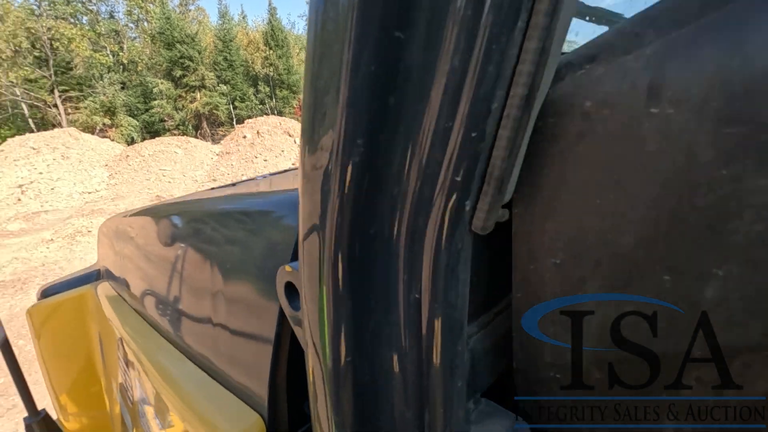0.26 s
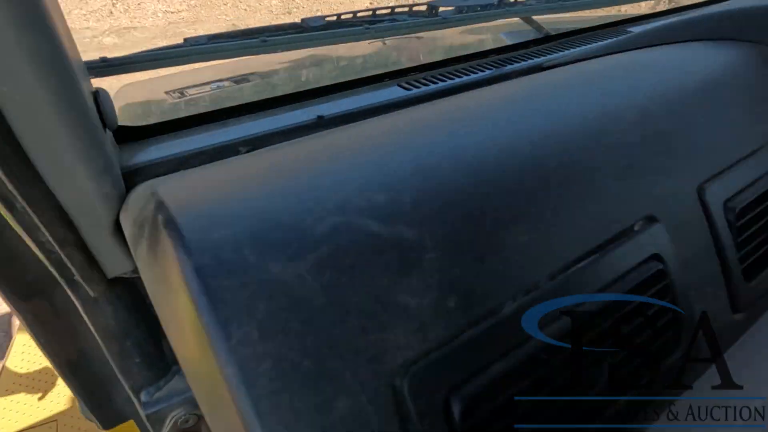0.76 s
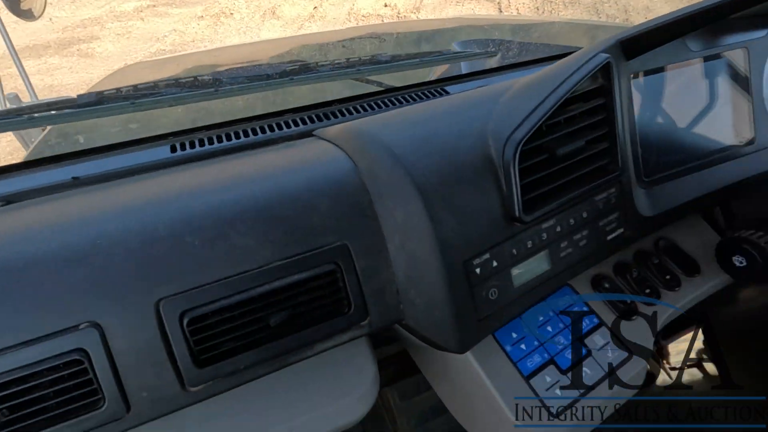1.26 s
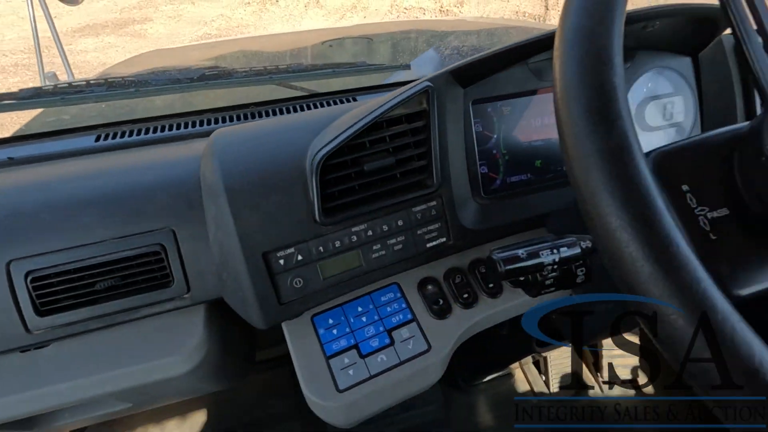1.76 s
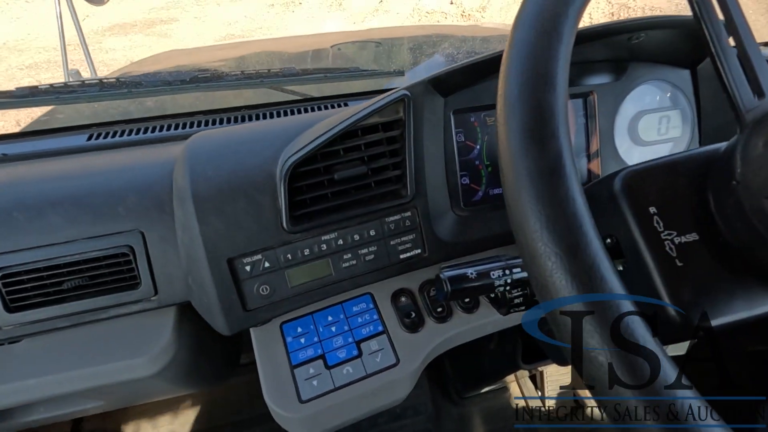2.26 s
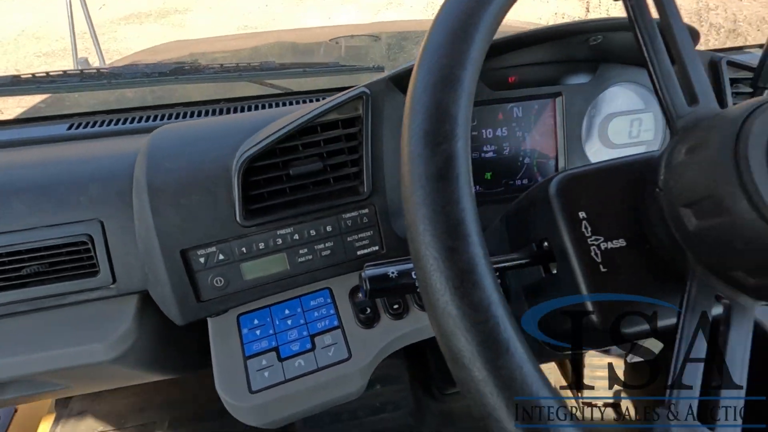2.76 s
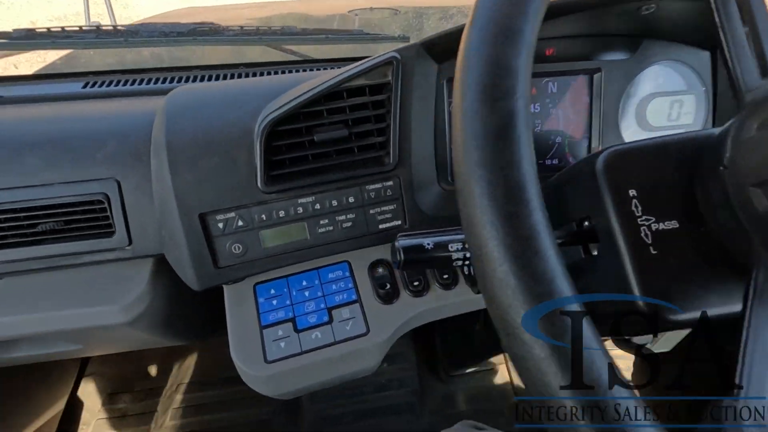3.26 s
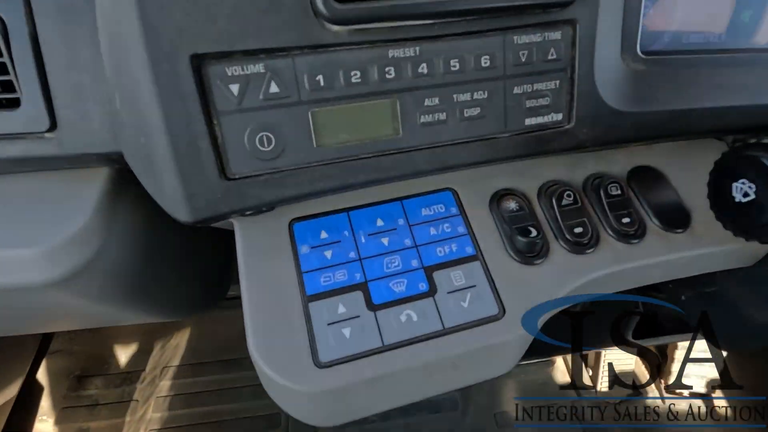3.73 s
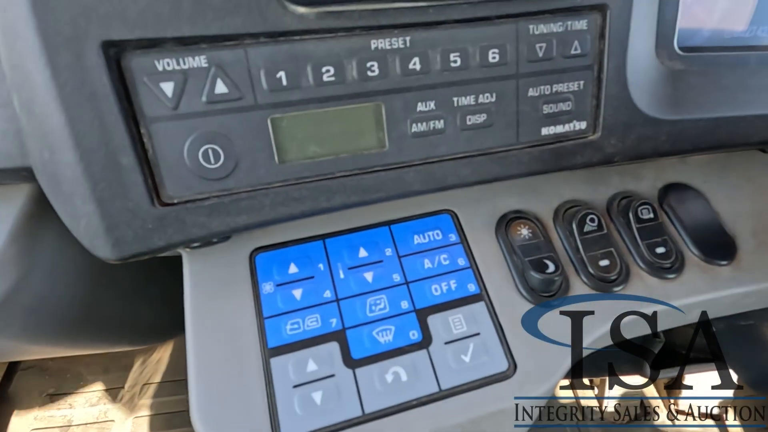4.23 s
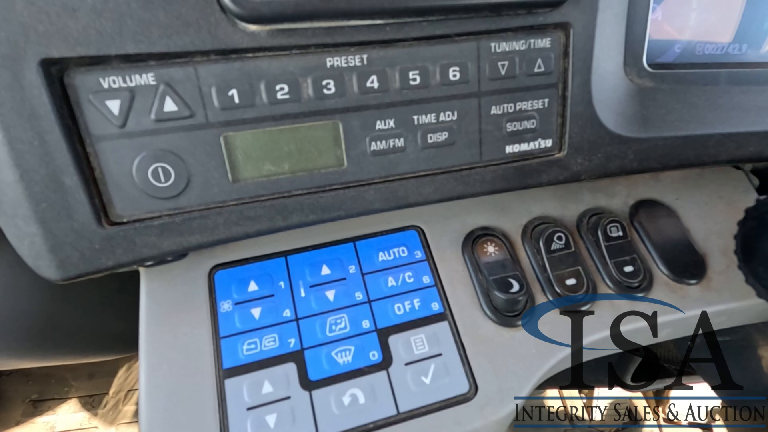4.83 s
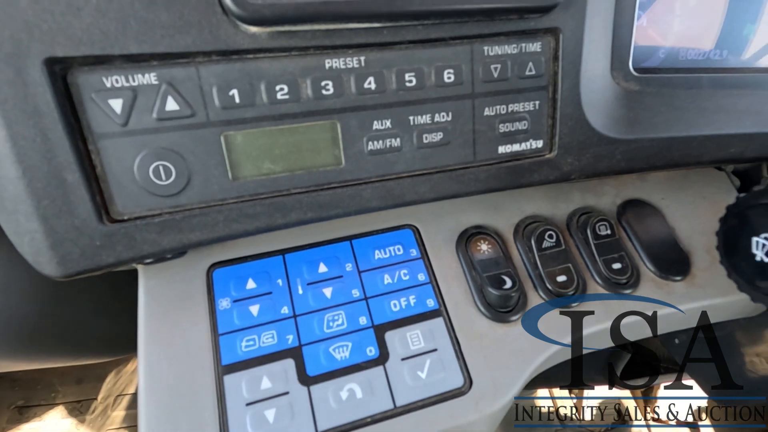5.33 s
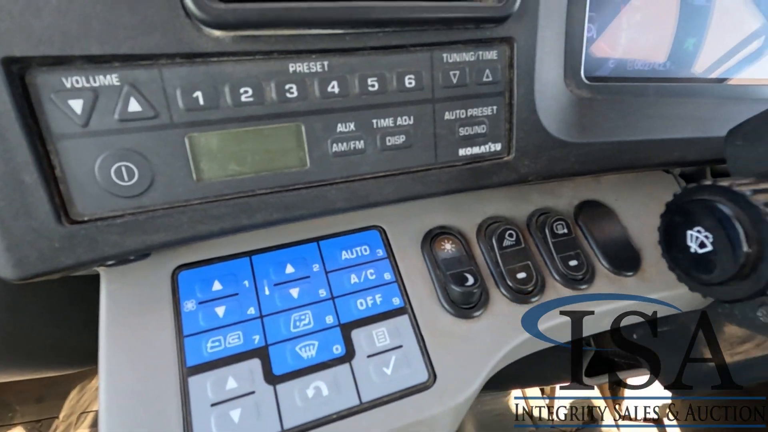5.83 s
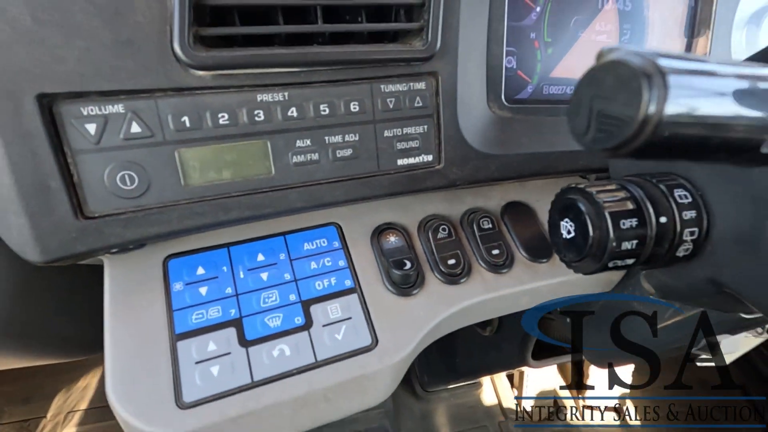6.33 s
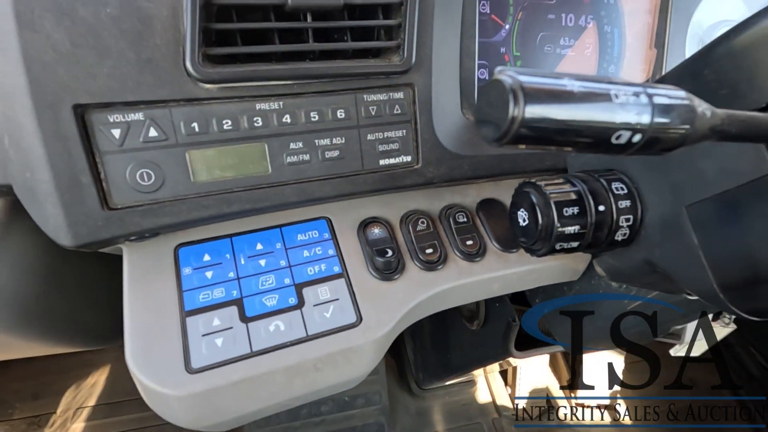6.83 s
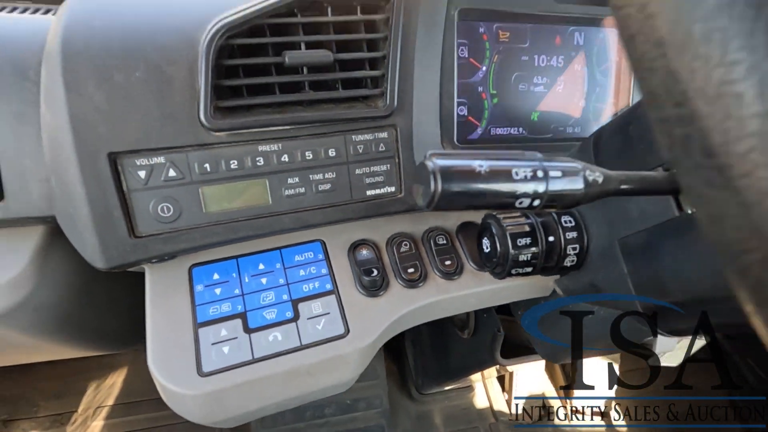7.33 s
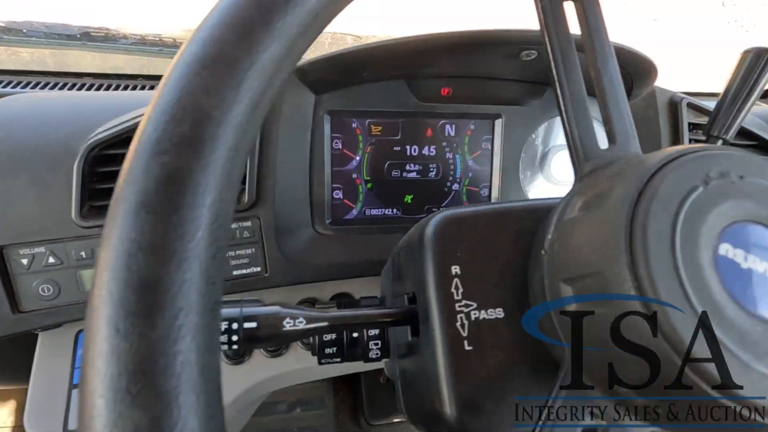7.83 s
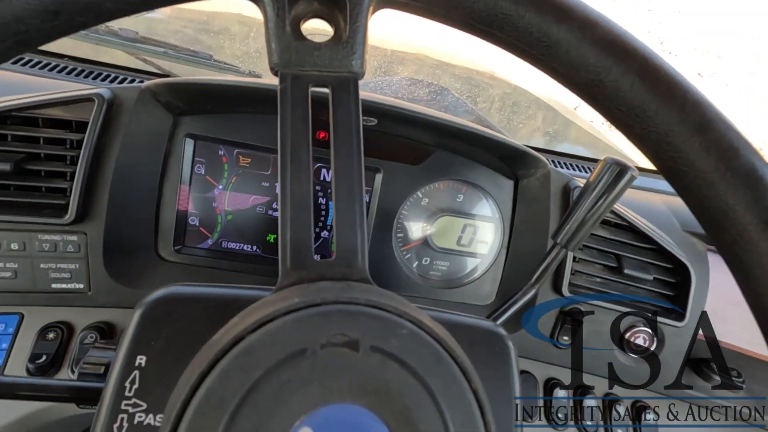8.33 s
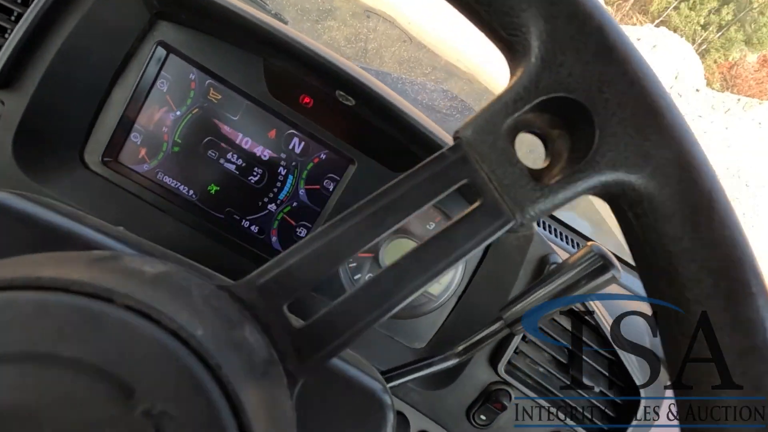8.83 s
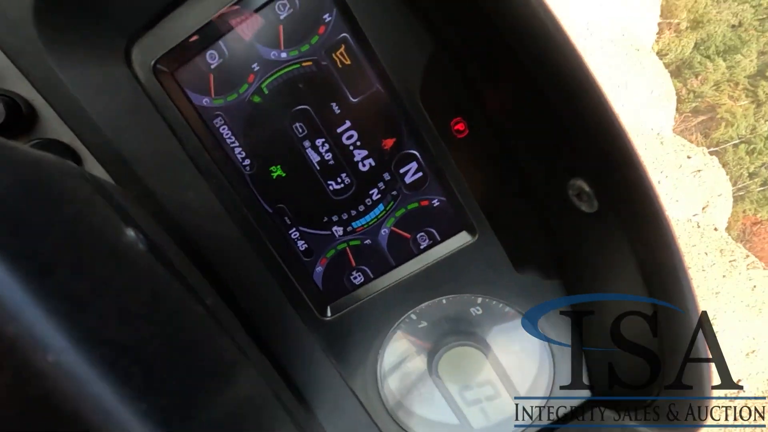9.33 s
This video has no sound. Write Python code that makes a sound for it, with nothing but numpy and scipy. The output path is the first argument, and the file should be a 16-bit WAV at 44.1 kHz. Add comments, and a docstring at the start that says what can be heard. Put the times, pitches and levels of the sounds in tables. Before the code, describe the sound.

From 0 s a large diesel idles steadily at the open cab door, a low fast throb with uneven metallic clatter, airy hiss and pump hum, close and fairly wide in stereo. At about 1.9 s the door hits its frame and bounces: a boomy knock, latch rattle and a low puff of air, the engine dipping for a moment and climbing back. At 3.2 s it slams harder, with a sharp crack, a cluster of rattles to 3.4 s and a deep heave of pressure. The clatter is now shut out, leaving a dark muffled drone with wavering hums. Dull seat thuds and soft creaks come from 3.5 to 4.7 s. A small buzzing valve tick falls about once a second, clearest from 5.8 s. The image narrows nearly to mono by 5.5 s. Faint rubbing begins near 8.9 s, a bump at 9.3 s and a heavy handling knock at 9.57 s.

```python
"""Diesel idle, from doorway to cab

A big six-cylinder diesel idles: wavering sine tones over shaped noise that clatters with each firing.
The camera moves from the open door into the cab; the door bounces once, then slams, as noise bursts,
ringing modes and a heave of air. The idle turns muffled, pumps hum and a valve ticks on the second.
The seat thuds, the camera case is tapped and rubbed, and the stereo picture narrows almost to mono."""
import sys
import numpy as np
from scipy import signal
from scipy.fft import rfft, irfft
from scipy.io import wavfile
from scipy.ndimage import uniform_filter1d

SR = 44100
rng = np.random.default_rng(int(sys.argv[2]) if len(sys.argv) > 2 else 0)


def wav_out(sig):
    """Save sig, one row per channel (or a flat mono array), as 16-bit PCM at SR to the path in sys.argv[1]."""
    wavfile.write(sys.argv[1], SR, np.round(np.clip(np.atleast_2d(sig).T, -1, 1) * 32767).astype(np.int16))


N = 422478  # length in samples


def amp(db):
    """Decibels to linear gain."""
    return 10 ** (np.asarray(db) / 20)


def evened(x):
    """Scales a signal to rms 1."""
    return x / np.sqrt(np.mean(x ** 2) + 1e-20)


def read(points, hz):
    """Reads a spectrum curve, joined by straight lines over log frequency."""
    f, value = np.transpose(points)
    return np.interp(np.log(hz + 1), np.log(f + 1), value)


def follow(rows, t):
    """Columns of a time table, joined by straight lines."""
    s, *columns = np.transpose(rows)
    return np.array([np.interp(t, s, c) for c in columns])


def bumps(rings, hz):
    """Resonant lifts in dB."""
    return sum(db / (1 + (2 * (hz - f) / width) ** 2) for f, width, db in rings)


def peaks(modes, hz):
    """Magnitude of a set of modes, their powers added."""
    power = sum(amp(2 * db) / (1 + (2 * (hz - f) / width) ** 2) ** 1.4 for f, width, db in modes)
    return np.sqrt(power)


def tilt(hz, db_per_octave):
    """Gain that slopes around 3 kHz."""
    return amp(db_per_octave * np.log2((hz + 1) / 3000))


def wander(t, top_hz):
    """Slow random drift of rms 1: sines of random phase, the slower the stronger."""
    rates_hz = np.geomspace(top_hz / 20, top_hz, 20)
    return evened(sum(np.sin(2 * np.pi * (f * t + rng.random())) / np.sqrt(f) for f in rates_hz))


def add(mix, s, level_db, shape, rise, t60, grit_db=0, hold=0):
    """A burst of noise coloured by shape(hz): soft rise, hold, exponential tail, broken into grains."""
    t = np.arange(SR // 3) / SR
    white, lumps = rng.standard_normal((2, len(t)))
    lumps = uniform_filter1d(uniform_filter1d(lumps, size=90), size=90)
    grains = amp(grit_db * evened(lumps))
    noise = irfft(rfft(white * grains) * shape(np.fft.rfftfreq(len(t), 1 / SR)), len(t))
    rising = np.sin(np.pi / 2 * np.clip(t / max(rise, 1e-4), 0, 1)) ** 2
    falling_db = -60 * np.clip(t - rise - hold, 0, None) / max(t60, .005)
    envelope = rising * amp(level_db + falling_db)
    burst = evened(noise * envelope) * np.sqrt(np.mean(envelope ** 2))  # the blow carries a set energy
    part = mix[round(s * SR):][:len(t)]
    part += burst[:len(part)]


OFF_CENTRE_DB = 11.5  # modes weaken per octave away from the favoured pitch


def strike(s, peak_db, near_hz, modes, rise):
    """A blow rings the modes of an object, most of all those near the pitch it favours."""
    t = np.arange(SR // 8) / SR
    ring = np.zeros(len(t))
    for (hz, db, t60), detune in zip(modes, rng.uniform(.99, 1.01, len(modes))):
        mode_db = db - OFF_CENTRE_DB * abs(np.log2(hz / near_hz))
        ring += amp(mode_db - 60 * t / max(t60, .005)) * np.sin(2 * np.pi * hz * detune * t)
    ring *= np.sin(np.pi / 2 * np.minimum(t / max(rise, 1e-4), 1)) ** 2
    return round(s * SR), amp(peak_db) * ring / abs(ring).max()


def struck(blows, modes, rise):
    """All blows on one object, each pushing the wave downward first."""
    out = np.zeros(N + SR)
    for s, db, hz in blows:
        at, ring = strike(s, db, hz, modes, rise)
        out[at:at + len(ring)] -= ring
    return out[:N]


# how far the sound comes through the doorway: start_s, open_share (0-1)
DOOR_SHARE = [(0, 0.93), (1.5, 0.94), (1.95, 0.84), (2.15, 0.62), (3.2, 0.83), (3.45, 0.32)]


def by_door(open_db, shut_db, t):
    """Blends a door-open and a door-shut level."""
    share = follow(DOOR_SHARE, t)[0]
    return share * open_db + (1 - share) * shut_db


# the engine as heard where the camera is held, before the dips:
# start_s, firing_db, rumble_db, drone_db
PLACE = [(0, -21.5, -27.5, -27.5), (0.4, -24, -26, -28.5), (0.76, -20.5, -31, -31),
         (0.95, -21.5, -28.5, -34), (1.5, -18, -32, -34.5), (1.8, -17.5, -33, -36),
         (2.45, -22, -36.5, -36.5), (3.5, -14, -25.5, -31.5), (4.3, -24.5, -25.5, -34.5),
         (5.1, -25, -28.5, -36), (6.6, -24, -26, -39), (7.5, -25.5, -29, -39), (8.1, -23.5, -26, -44.5),
         (9.1, -24.5, -27, -45), (9.58, -25, -25.5, -43)]
# around each blow of the door the level dips and climbs back: start_s, depth_db, fall_s, climb_db_per_s
DIPS = [(1.899, 18, 0.17, 10), (3.25, 23, 0.38, 9.5)]
FIRING_DIP, RUMBLE_DIP = 0.61, 0.4  # the bass dips less: share of the depth
HISS_OPEN_DB, HISS_SHUT_DB = -9, -11.5  # hiss relative to the drone


def levels(t):
    """Firing tone, rumble, drone and hiss in dB: the place of the camera, less the dips."""
    dip_db = 0
    for s, depth, fall, climb in DIPS:
        falling, climbing = depth * (t - s) / fall, depth - climb * (t - s - fall)
        dip_db = dip_db + np.clip(np.minimum(falling, climbing), 0, None)
    firing_db, rumble_db, drone_db = follow(PLACE, t)
    hiss_db = drone_db + by_door(HISS_OPEN_DB, HISS_SHUT_DB, t)
    return np.array([firing_db, rumble_db, drone_db, hiss_db]) - np.outer([FIRING_DIP, RUMBLE_DIP, 1, 1], dip_db)


FIRING_HZ, PUMP_HZ, GEAR_HZ = 35.55, 168.9, 225.1
# pump and gear tones relative to the rumble, through the standing waves of the cab:
# start_s, pump_db, gear_mesh_db, twice_pump_db
STANDING = [(0, -15, -25.5, -10), (1.5, -7.5, -9.5, -28), (2.6, -8, -10, -9.5), (3.6, -24, -17, -24),
            (4.2, -17, -9.5, -15.5), (5, -13.5, -10, -9.5), (6, -9.5, -10.5, -10.5),
            (7.4, -26.5, -6.5, -6.5), (8.5, -5, -13.5, -23.5), (9.1, -8, -11.5, -18.5),
            (9.58, -20, -11.5, -28)]
# upper pump orders relative to the drone: start_s, three_times_pump_db, four_times_pump_db
PUMP_UPPER = [(0, -20, -38), (2.2, -16, -21), (3.498, -7.5, -20), (5, -12, -29), (6, -13, -31),
              (7.8, -8, -19), (8.3, -6, -15.5), (8.7, -10.5, -10.5), (9.58, 0, -12)]
# accessory tones: pitch_hz
WHINE_HZ = [23.7, 50.2, 88.9, 99.8, 141.2, 426.5, 514.2, 1013.3, 1049, 1706.5, 379.6, 791.3]
# the same tones relative to the rumble under LOW_HZ, to the drone above: open_db, shut_db
WHINE_DB = [(-2.5, -12.5), (-10.5, -20.5), (-13, -16.5), (-1.5, -21.5), (-13.5, -13), (-8, -48),
            (-29, -10.5), (-16.5, -37.5), (-17.5, -38), (-22, -40), (-20, -15), (-28.5, -18)]
LOW_HZ = 150


def tones():
    """Firing, pump, gear and accessory tones share the slightly hunting crank speed."""
    t = np.arange(N) / SR
    crank_s = np.cumsum(1 + .0007 * wander(t, 2.5)) / SR
    share = follow(DOOR_SHARE, t)[0]
    firing_db, rumble_db, drone_db, _ = levels(t)
    pump_gear_db = rumble_db + follow(STANDING, t)
    upper_db = drone_db + follow(PUMP_UPPER, t)
    orders_hz = [FIRING_HZ, PUMP_HZ, GEAR_HZ, 2 * PUMP_HZ, 3 * PUMP_HZ, 4 * PUMP_HZ]
    rows = list(zip(orders_hz, [firing_db, *pump_gear_db, *upper_db]))
    # the cab slightly favours the second firing order
    rows.append((2 * FIRING_HZ, -40 + 0.55 * (1 - share) + 0.2 * (firing_db + 25)))
    for hz, (open_db, shut_db) in zip(WHINE_HZ, WHINE_DB):
        bed_db = rumble_db if hz < LOW_HZ else drone_db
        rows.append((hz, bed_db + by_door(open_db, shut_db, t)))
    out = np.zeros(N)
    for hz, rms_db in rows:
        waver_db = 0.67 * np.interp(t, t[::256], wander(t[::256], 6.4))
        out += np.sqrt(2) * amp(rms_db + waver_db) * np.sin(2 * np.pi * (hz * crank_s + rng.random()))
    return out


# bands that set the noise to rumble, drone and hiss level: low_hz, high_hz
NOISE_BANDS = [(60, 300), (400, 2000), (2500, 9000)]
# spectrum shapes of the engine through the doorway and through the cab walls: pitch_hz, relative_db
DOORWAY = [(12, -17.5), (30, -7.5), (50, -10.5), (70, -12.5), (101, -14), (279, -17), (644, -24.5),
           (1010, -22.5), (2560, -35.5), (3700, -40.5), (8000, -51), (10500, -62.5), (15400, -87.5)]
WALLS = [(12, 2), (30, -0.5), (60, -5.5), (140, -8.5), (175, -16), (344, -15.5), (478, -28), (1170, -37),
         (4000, -51), (7970, -72.5), (15400, -112)]
# resonances on those shapes: pitch_hz, width_hz, lift_db
DOORWAY_RINGS = [(111, 72, 10.5), (416, 87, -3), (970, 160, 2), (3530, 510, 5.5), (6800, 260, 3.5),
                 (12300, 1200, 9)]
WALL_RINGS = [(97, 100, 6), (791, 36, 12.5), (894, 72, 6.5), (1310, 66, 4.5), (1880, 310, 6),
              (2697, 240, 6), (4020, 630, 4)]
CYLINDER_DB = [5.0, 4.0, 3.5, 7.0, 3.0, 5.0]  # relative clatter of the six cylinders in turn


def block():
    """Broad engine noise; the firings clatter strongly through the doorway, barely through the walls."""
    frames, hz = N // 512 + 6, np.fft.rfftfreq(2048, 1 / SR)
    t = np.arange(frames) * 512 / SR
    a, b, patches, panels = rng.standard_normal((frames, len(hz), 4)).T
    # narrow rings that linger, and broad patches that change quickly
    panels = evened(uniform_filter1d(uniform_filter1d(panels, size=70, axis=1), size=2, axis=0))
    patches = evened(uniform_filter1d(uniform_filter1d(patches, 6, 1), 14, 0))
    share = follow(DOOR_SHARE, t)[0]
    doorway_db = read(DOORWAY, hz) + bumps(DOORWAY_RINGS, hz)
    walls_db = read(WALLS, hz) + bumps(WALL_RINGS, hz)
    shape_db = np.outer(doorway_db, share) + np.outer(walls_db, 1 - share)
    # lift each band of the shape to its wanted level
    power = amp(2 * shape_db)
    held_db = [10 * np.log10(power[(hz > lo) & (hz < hi)].sum(0)) for lo, hi in NOISE_BANDS]
    lift_db = levels(t)[1:] - held_db
    centres = np.log([np.sqrt(lo * hi) for lo, hi in NOISE_BANDS])
    blend = np.array([np.interp(np.log(hz + 1), centres, row) for row in np.eye(len(centres))])
    surge_db = 1.5 * share * wander(t, 5.0)  # the roar swells in lumps through the doorway
    level_db = shape_db + blend.T @ lift_db + np.outer(blend[1], surge_db)
    z = (a + 1j * b) * amp(level_db + 0.92 * patches + 1.53 * panels)
    noise = signal.istft(z, nperseg=2048, noverlap=1536)[1][:N]
    s = np.arange(N) / SR
    firing = s * FIRING_HZ
    cylinder = amp(CYLINDER_DB)[np.round(firing).astype(int) % 6]
    knock = cylinder * np.exp(0.66 * (np.cos(2 * np.pi * firing) - 1))
    upper = signal.sosfilt(signal.butter(2, 600, "high", fs=SR, output="sos"), noise)
    clatter = 0.032 + 0.31 * follow(DOOR_SHARE, s)[0]
    return noise + upper * (knock - knock.mean()) * clatter


# valve ticks on the second: tick_s, buzz_db (before a 2 dB lift), low_ring_db (relative to buzz_db),
# slope_db_per_octave
TICKS = [(0.772, -51, 19, -2), (2.77, -50.5, 9, -6.5), (3.7763, -58.5, -1, -13), (4.771, -50, 3, -9),
         (5.776, -43, 10, -16.5), (6.771, -41, 3, -9), (7.776, -46, 7, -13), (8.7726, -47, 6, -6)]
# valve modes, the first being the low ring: pitch_hz, width_hz, relative_db
VALVE = [(1000, 60, 0), (3740, 320, 12), (4640, 500, 8.5), (5950, 4000, 4), (9350, 690, 6.5),
         (12300, 1100, -15)]
TICK_RISE_S, TICK_HOLD_S, TICK_T60_S = 0.0063, .011, 0.13


def valve():
    """A short buzz through a few metal modes swells, holds and dies over one low ring."""
    out = np.zeros(N)
    for s, db, low_db, slope_db in TICKS:
        def buzz(hz):
            return peaks(VALVE[1:], hz) * tilt(np.maximum(hz, 2500), slope_db)
        add(out, s - .004, db + 2.0, buzz, TICK_RISE_S, TICK_T60_S, 1.2, TICK_HOLD_S)
        add(out, s + 0.00186, db + low_db, lambda hz: peaks(VALVE[:1], hz), .005, .1)
    return out


# cabin air squeezed by the door, then springing:
# release_s, squeeze (0-1), build_s, swing (0-1), pitch_hz, t60_s
AIR = [(1.921, 0.31, 0.042, 0.72, 10.3, 0.8), (3.202, 0.35, 0.056, 0.74, 14.2, 0.55),
       (3.45, 0.08, 0.034, 0.17, 25.3, 0.63)]


def air():
    """Air pressure builds as the door swings shut and springs back."""
    t, out = np.arange(N) / SR, np.zeros(N)
    for s, squeeze, build, swing, hz, t60 in AIR:
        before, after = np.clip(s - t, 0, None), np.clip(t - s, 0, None)
        # the height grows from squeeze to swing over a quarter cycle
        height = squeeze + (swing - squeeze) * np.clip(4 * hz * after, 0, 1)
        spring = height * np.cos(2 * np.pi * hz * after) * amp(-60 * after / t60)
        out += spring * np.exp(-(before / build) ** 2)
    return out


# the door hits its stop with a short push: centre_s, height (linear), half_width_s
BLOWS = [(1.975, 0.36, 0.013), (3.2345, 0.8, 0.0028)]
# latch and panel rattles: start_s, level_db (before the trims), slope_db_per_octave, rise_s, t60_s
RATTLES = [(1.954, -17.5, -0.5, 0.0017, 0.082), (1.963, -20.5, -3, 0.0033, 0.073),
           (2.001, -21.5, -1.5, .0008, 0.13), (2.045, -30.5, 2, 0.019, 0.16), (2.104, -40, 0, .004, 0.16),
           (2.182, -43.5, -1.5, 0.0041, 0.18), (3.2235, -15, 0.5, 0.003, 0.09),
           (3.233, -13.5, 4, 0.0013, 0.074), (3.262, -15.5, -1.5, .001, 0.15),
           (3.291, -17, -1, 0.0015, 0.14), (3.3255, -17.5, -0.5, 0.0008, 0.14),
           (3.398, -24.5, -3.5, 0.0028, 0.14)]
# the door seal rushes as it meets and leaves the frame: start_s, level_db (before the trims), rise_s, t60_s
SEAL = [(1.899, -25.5, 0.054, 0.37), (3.19, -22, 0.043, 0.39), (3.344, -25.5, 0.032, 0.21)]
# spectrum shapes of the rattle and of the door panel's boom: pitch_hz, relative_db
RATTLE = [(590, -33), (1000, -5), (1650, -6), (3400, -7), (4040, -9), (7320, -12.5), (12000, -32),
          (15400, -49)]
BOOM = [(40, -13), (100, 7), (300, 9.5), (700, 3), (1500, -8.5), (3000, -60)]
# sharp knocks of the door on its frame: start_s, peak_db, favoured_hz
KNOCKS = [(1.965, -17.5, 2560), (1.97, -23, 1200), (2.001, -26, 5600), (2.003, -25, 2800),
          (2.009, -24.5, 566), (3.241, -26, 302), (3.256, -21, 300), (3.263, -26, 3400), (3.266, -15, 560),
          (3.294, -30, 1400), (3.3, -27, 500), (3.326, -21, 2800), (3.33, -26, 1000)]
# frame modes: pitch_hz, relative_db, t60_s
FRAME = [(242, -1, 0.072), (494, -0.5, 0.12), (620, -1.5, 0.11), (855, 2.5, 0.032), (1276, 4, 0.033),
         (2547, 8, 0.034), (2750, 2, 0.072), (3390, -2, 0.12), (5500, 6, 0.059)]
SEAL_SLOPE_DB = -3  # per octave
RATTLE_TRIM_DB, BOUNCE_BOOM_DB, SLAM_BOOM_DB = -8.0, -13, -6.5  # trims on each burst's level


def door():
    """The door hits its stop: a push, latch and panel rattles with a boom under each, seal and frame."""
    t, out = np.arange(N) / SR, np.zeros(N)
    for s, height, half in BLOWS:
        out += height * np.exp(-((t - s) / half) ** 2)
    bursts = RATTLES + [(s, db, SEAL_SLOPE_DB, rise, t60) for s, db, rise, t60 in SEAL]
    slam_s = SEAL[1][0]
    for s, db, slope_db, rise, t60 in bursts:
        boom_db = db + (SLAM_BOOM_DB if s >= slam_s else BOUNCE_BOOM_DB)
        add(out, s, db + RATTLE_TRIM_DB, lambda hz: amp(read(RATTLE, hz)) * tilt(hz, slope_db), rise, t60, 1.5)
        # the panel answers later and rings longer
        add(out, s, boom_db, lambda hz: amp(read(BOOM, hz)), rise + 0.0094, 1.9 * t60, 1.5)
    return out + struck(KNOCKS, FRAME, 0.00058)


# dull thuds from the seat and the hand: start_s, peak_db, favoured_hz
THUDS = [(3.7695, -30, 500), (3.776, -20, 550), (3.7875, -20, 253), (3.838, -25.5, 557), (4.035, -28, 396),
         (4.0785, -22, 446), (4.112, -23.5, 303), (4.151, -26.5, 448), (4.165, -32, 392), (4.345, -29, 450),
         (4.386, -30, 600), (9.3375, -16, 148), (9.569, -17, 278), (9.5735, -9, 205)]
# seat modes: pitch_hz, relative_db, t60_s
SEAT = [(110.6, 2.5, 0.14), (208, 2, 0.072), (307, 2.5, 0.035), (566, -4.5, 0.035), (914, -8.5, 0.02)]
SETTLE_FROM_S, SETTLE_TO_S = 3.48, 4.7  # the seat creaks between these times


def seat():
    """Dull thuds ring the seat's modes; crunches and random soft creaks rub them into broad noise."""
    out = struck(THUDS, SEAT, 0.0027)
    cushion = [(hz, 5 / t60, db) for hz, db, t60 in SEAT]  # rubbed, the seat's modes broaden
    for s, db, near in THUDS:  # the cover crunches with each thud
        def crunch(hz):
            return peaks(cushion, hz) * amp(-abs(np.log2((hz + 1) / near)) * 3)
        add(out, s - .006, db - 12.5, crunch, .009, .07, 2.5)
    for when, size, bright in rng.random((40, 3)):
        def creak(hz):  # slopes around the third seat mode
            return peaks(cushion, hz) * tilt(hz / SEAT[2][0] * 3000, -2.5 - 5 * bright)
        start_s = np.interp(when, [0, 1], [SETTLE_FROM_S, SETTLE_TO_S])
        add(out, start_s, -42 - 3 * when - 9 * size, creak, .015, .08, 1.5)
    return out


# taps on the camera case: start_s, level_db, slope_db_per_octave
TAPS = [(8.938, -56, -3), (9.046, -59, -3), (9.331, -31, 2), (9.56, -19.5, -5.5), (9.5634, -21.5, -4),
        (9.567, -27, -7)]
# case modes: pitch_hz, width_hz, relative_db
CASE = [(500, 800, 1), (1320, 810, 13.5), (3400, 1700, -10), (4840, 900, -8), (8600, 1600, -8),
        (12300, 1000, -27)]
# fingers rubbing the case: start_s, level_db, rise_s
RUBS = [(8.92, -60, .02), (9.1, -64.5, .1), (9.314, -61, 0.016), (9.41, -66, .045)]
TAP_RISE_S, TAP_T60_S = .003, .026
RUB_HZ, RUB_WIDTH_HZ, RUB_T60_S = 6600, 9000, 0.48  # width before the curve is squared


def camera_case():
    """Taps excite the modes of the case; rubs are one broad band of noise with a long tail."""
    out = np.zeros(N)
    for s, db, slope_db in TAPS:
        def tap(hz):
            return peaks(CASE, hz) * tilt(np.maximum(hz, 600), slope_db)
        add(out, s, db, tap, TAP_RISE_S, TAP_T60_S, 1.5)
    for s, db, rise in RUBS:
        add(out, s, db, lambda hz: peaks([(RUB_HZ, RUB_WIDTH_HZ, 0)], hz) ** 2, rise, RUB_T60_S, 1.5)
    return out


# base stereo width over pitch: pitch_hz, side_minus_mid_db
SIDE = [(60, -32.5), (150, -24), (380, -15), (950, -9.5), (2380, -4.5), (5960, -6), (15000, -3)]
# offsets to that width over time: start_s, bass_db, treble_db
WIDTH = [(0, -3.5, -3.5), (3.1, -2.5, -0.5), (3.5, 1, 0), (4, 14.5, -3), (4.4, 7, -12.5), (4.8, -3.5, -27),
         (5.5, -57, -48)]


def widen(mid):
    """Stereo from one signal: the side is a scattered copy of the mid, leaning by pitch."""
    hz, t, z = signal.stft(mid, SR, nperseg=512)
    a, b = rng.standard_normal((len(t), len(hz), 2)).T
    bass_db, treble_db = follow(WIDTH, t)
    treble = np.clip(np.log2((hz + 1) / 700), 0, 1)
    # treble arrives from the left, bass slightly from the right
    lean = np.clip(0.62 * treble - .25, -1, 1)[:, None]
    scatter = lean + np.sqrt(1 - lean ** 2) * (a + 1j * b)
    width_db = read(SIDE, hz)[:, None] + np.outer(1 - treble, bass_db) + np.outer(treble, treble_db)
    side = signal.istft(z * scatter * amp(width_db), SR, nperseg=512)[1][:N]
    return np.array([mid + side, mid - side])


STIFLE_DB = 31  # dB per unit of pressure


def scene():
    """Everything meets at the microphone pair; engine tones sink while the cabin air heaves."""
    heave = air()
    stifled = tones() * amp(-STIFLE_DB * uniform_filter1d(abs(heave), size=2000))
    return widen(stifled + block() + valve() + heave + door() + seat() + camera_case())


EDGE_HZ = 15500


def record(dry):
    """The band limit: a steep low-pass at EDGE_HZ."""
    lowpass = signal.firwin(511, EDGE_HZ, window=("kaiser", 9), fs=SR)
    return signal.oaconvolve(dry, lowpass[None], "same")


dry = scene()
out = record(dry)
wav_out(out)
```